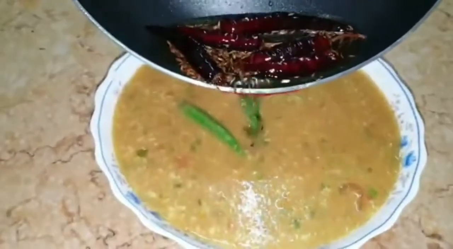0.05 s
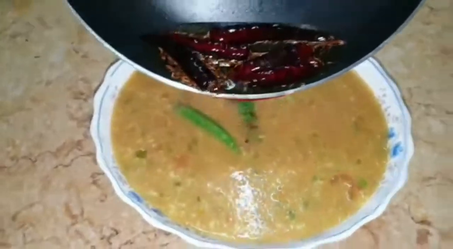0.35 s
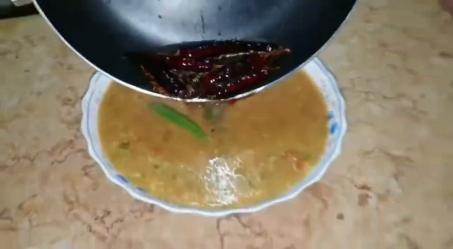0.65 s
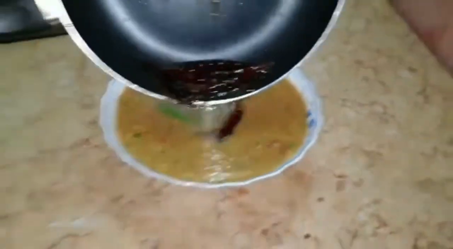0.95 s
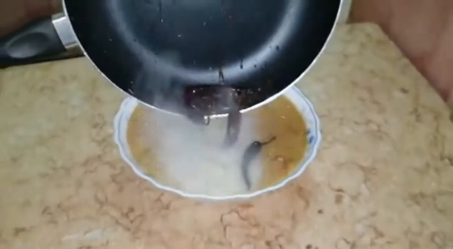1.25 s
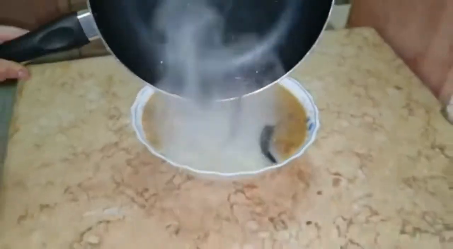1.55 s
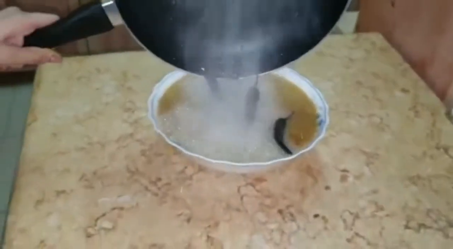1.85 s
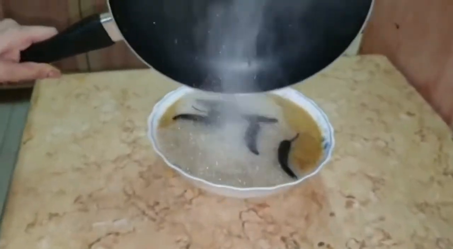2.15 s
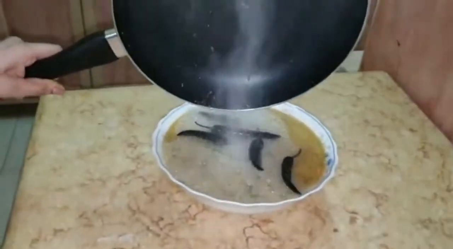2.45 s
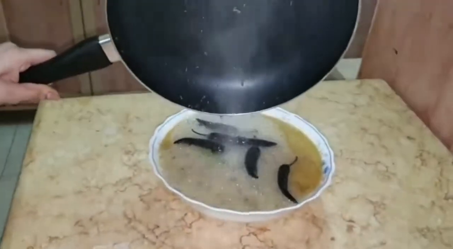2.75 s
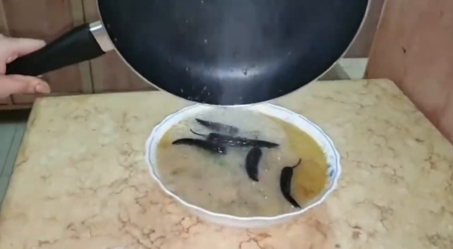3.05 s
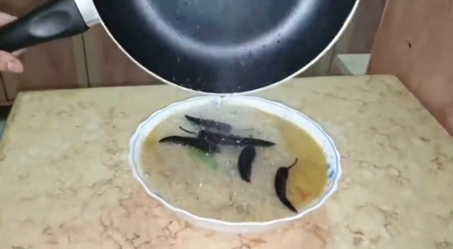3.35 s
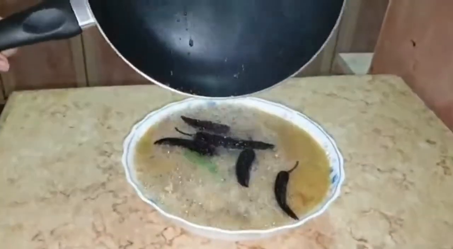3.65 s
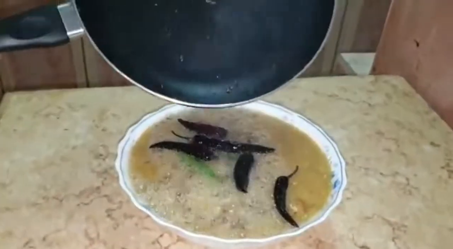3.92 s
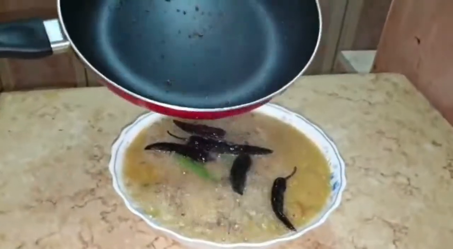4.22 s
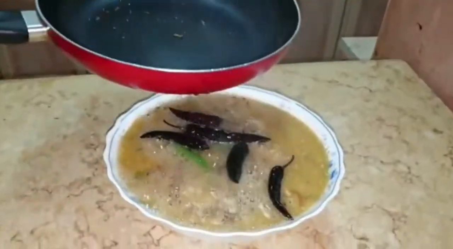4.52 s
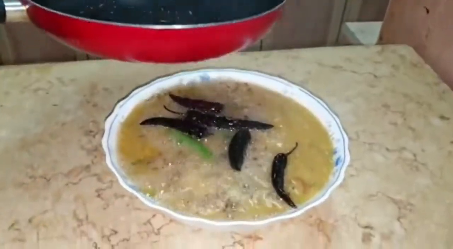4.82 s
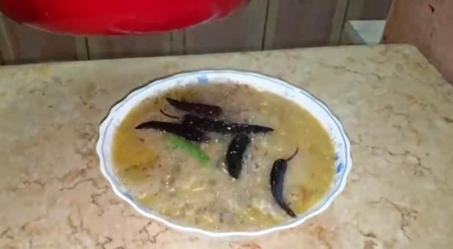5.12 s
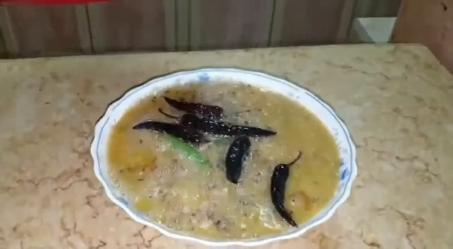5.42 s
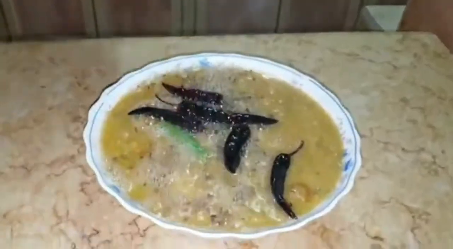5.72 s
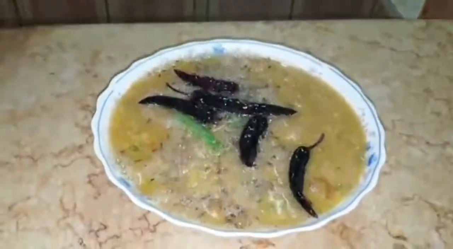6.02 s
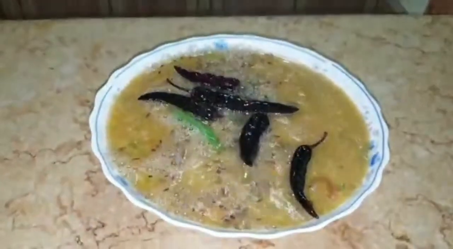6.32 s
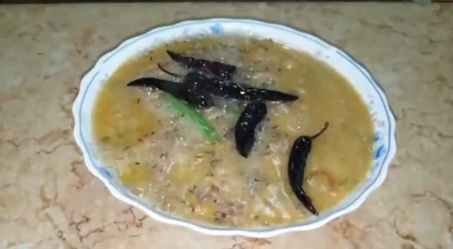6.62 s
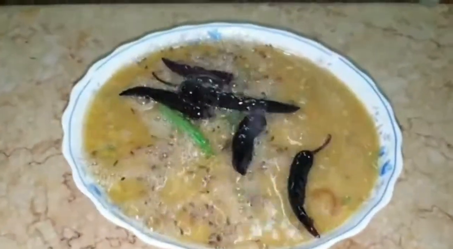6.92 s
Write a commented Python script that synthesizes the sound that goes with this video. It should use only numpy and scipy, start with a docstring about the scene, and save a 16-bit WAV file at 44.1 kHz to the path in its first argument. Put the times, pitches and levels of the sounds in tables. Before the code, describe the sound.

Close by in a kitchen, a dense, bright sizzle flares up as hot oil lands in a bowl of cooked lentils. After a single loud spit, the hiss gradually dies down to a gentle fizzing simmer, where separate bubbles pop, tick and ping more and more often. Behind it are a soft, wavering motor hum and a low room rumble that rises toward the end.

```python
"""Hot spiced oil sizzles as it is poured from a pan onto a bowl of dal on a kitchen counter.
Water flashes to steam in thousands of tiny bursting bubbles, each a damped, slightly rising sine.
The fierce sizzle spits once, then thins to a quiet crackle with snaps, pings and one soft splutter.
A motor hums in the room; a low rumble grows toward the end."""
import sys
import numpy as np
from scipy import signal
from scipy.fft import rfft, irfft
from scipy.io import wavfile
from scipy.ndimage import uniform_filter1d

SR = 44100
rng = np.random.default_rng(int(sys.argv[2]) if len(sys.argv) > 2 else 0)


def log_audio(samples):
    """Write samples as a 16-bit WAV file to the path given in sys.argv[1]."""
    # one column per channel
    frames = np.atleast_2d(samples).T
    # limit to full scale, then quantise
    limited = np.clip(frames, -1, 1)
    pcm = np.round(limited * 32767).astype(np.int16)
    wavfile.write(sys.argv[1], SR, pcm)


N = 316197
T = np.arange(N) / SR
TOP_HZ = 16150
LEAD_SAMPLES = 32  # pad before a bubble, so either channel can lead

# oil meets water, 7 in the pour, 3 late spatters: start_s, rise_s, cool_s, large_db, medium_db, fine_db
SPLASH_FLARES = [(0.036, 0.064, 0.52, -37.5, -34, -27), (0.155, 0.13, 1.4, -25, -28, -23.5),
                 (0.38, 0.035, 0.23, -25, -29, -33), (0.51, 0.06, 0.36, -28.5, -21.5, -24.5),
                 (0.64, 0.066, 0.05, -42, -20, -20.5), (0.9, 0.16, 1.1, -25.5, -20, -22.5),
                 (0.98, 0.19, 0.18, -24.8, -39, -22), (5.7, 0.034, 0.14, -44, -47, -55),
                 (6.65, 0.029, 0.1, -45, -57, -39), (6.905, 0.0069, 0.031, -59, -52, -36)]
# large, medium, fine bubbles: cool_factor, fade_exponent, simmer_db
BUBBLE_SIZES = [(1.226, 1.6, -42.5), (1.61, 1.2, -37.5), (1.16, 1.86, -36)]
# limits of the three sizes: edge_hz
SIZE_EDGES_HZ = [900, 2500, 8000, 16000]
# lasting simmer: time_s, gain_db
SIMMER_SWELL = [(0, -29.5), (1.1, -8), (3.75, 1.8), (3.97, 0), (4.15, 1.7), (4.5, 0.8), (4.79, 1.6),
                (4.87, -1), (5.0, 1.7), (5.32, 1.1), (5.5, -1.5), (5.7, -0.1), (5.92, -1.2), (6.25, -1.76),
                (6.4, -3), (6.54, -1.2), (7.02, -2), (7.09, -3.5)]
# sizzle colour per stage: freq_hz, gain_db
TRICKLE_EQ = [(240, -49), (400, -23), (607, -15.5), (730, -18.5), (1000, -12), (1150, -1.5), (1420, -1.5),
              (1900, -1), (2300, -3), (3300, -8), (3950, -4), (5960, -9), (7060, -9.5), (8500, -13),
              (12700, -10.5), (16000, -18)]
PLUNGE_EQ = [(240, -58), (400, -19), (460, -19), (496, -17.5), (921, -11), (1160, -14), (1560, -4.5),
             (2100, -2.2), (2550, -3.5), (3160, -6.5), (3990, -6.5), (5030, -11), (7400, -11), (8630, -14),
             (12700, -7), (16000, -17)]
FOAM_EQ = [(240, -44), (400, -6), (432, -33), (467, -5), (616, -13.5), (1140, -7.5), (1310, -19),
           (1420, -8.5), (1990, -3.5), (3260, -1.5), (4200, -3), (7630, -7), (8630, -11), (10700, -6.5),
           (13300, -6), (16000, -12)]
SIMMER_EQ = [(350, -10), (700, -18.5), (1000, -12), (1200, -3.5), (1450, 2.5), (1700, -2.5), (2050, 0.5),
             (2500, 0), (3150, -4), (3600, 0.5), (4300, 3), (6000, 1), (7400, 1), (8900, -7), (11000, -2.5),
             (14000, -4.5), (16000, -11.5)]
# colour blend: time_s, stage (0 trickle, 1 plunge, 2 foam, 3 simmer)
POUR_STAGE = [(0, 0), (.55, 0), (.7, 0.5), (.82, 0.85), (1.05, 1), (1.4, 1.5), (2.1, 1.5), (2.8, 2.5),
              (3.6, 2.5), (4.6, 2.5)]
# crackle over fizz: time_s, gain_db
CRACKLE_MIX = [(0, -4.5), (.4, -8), (1.2, -9), (2.4, -6), (3.5, -7.5), (4.6, -3), (6, 1), (7.1, -0.5)]
# flicker of the sizzle's colour: freq_hz, depth_db
SIZZLE_FLICKER = [(1400, 2.0), (4000, 1), (12000, 1.76)]
# microphone port balance: freq_hz, left_minus_right_db
PORT_BALANCE = [(200, -6), (600, 3.2), (1100, 0.5), (2200, -6), (2800, -2.5), (3300, -1), (4300, 0),
                (6700, 5.5), (8500, 3.5), (10000, 1), (12500, -2), (16000, -1)]
# kitchen decay: freq_hz, t60_s
ROOM_DECAY = [(300, 0.72), (2000, 0.14), (6000, 0.27), (15000, 0.057)]
# room noise colour: freq_hz, gain_db
ROOM_NOISE_EQ = [(15, -35), (25, -4), (40, -5), (59, -10.5), (110, -5.5), (178, -10), (201, -9),
                 (230, -7.5), (383, -5.5), (452, -11), (900, -21), (1170, -45), (1980, -120)]
# room noise width: freq_hz, side_db
ROOM_NOISE_SIDE = [(40, -17), (130, -14.0), (260, -10.5), (600, -1)]
# deep and upper rumble: time_s, gain_db
DEEP_SWELL = [(0.02, -46), (0.86, -55), (1.51, -55), (1.77, -46), (2.05, -54), (2.31, -56), (2.87, -45),
              (3.01, -64), (3.27, -38), (4.2, -59), (4.42, -42), (4.7, -47), (5.14, -49), (5.75, -50),
              (6.6, -40), (6.85, -41), (6.99, -53), (7.17, -35)]
UPPER_SWELL = [(0.0, -55), (0.2, -47.5), (0.92, -52), (1.05, -46), (1.9, -46), (3.01, -54.5), (3.3, -43),
               (3.73, -53), (4.19, -49), (4.47, -54), (4.57, -48), (6.5, -48.5), (6.76, -37), (6.9, -39),
               (7.0, -41.5), (7.17, -31)]
# motor lines: pitch_hz, level_db
MOTOR_LINES = [(58, -52.5), (117, -63), (176, -57), (229, -58), (458, -61.5)]
# motor swell: time_s, gain_db
MOTOR_SWELL = [(0.05, 13), (0.2, 9), (1.0, -2), (1.55, 1), (1.75, 12), (2.1, 6), (2.3, -3.5), (3.1, -3),
               (3.3, -2), (3.8, -3), (4.3, 4), (4.6, 2.5), (5.35, 4), (5.75, 1), (6.05, -2), (6.3, 9),
               (6.65, 15.5), (6.8, 11), (7.17, 7)]
# dry bursts: start_s, knock_db, knock_hz, tick_db, left_minus_right_db
SNAP_EVENTS = [(0.1497, -18, 7890, -15, -2), (3.6664, -20, 5150, -19, -3), (3.9641, -22, 3510, -28, 1),
               (4.5676, -23, 4220, -17, -4), (4.6256, -22, 2010, -30, -2), (5.2136, -18, 5590, -26, 1),
               (5.3844, -24, 2130, -30, -4), (5.6274, -20, 6640, -23, 3), (5.2829, -20, 5140, -20, -1),
               (5.3538, -16, 5740, -27, 2), (5.5215, -17, 6190, -27, 0), (5.7231, -18, 2350, -30, -4),
               (6.0427, -18, 7400, -11.5, -4), (6.217, -21, 6980, -24, 3), (6.0241, -22, 2000, -32, -5),
               (6.1483, -19.5, 2300, -28, -5), (6.2499, -23, 2480, -30, -4), (6.2651, -19, 5360, -24, 2),
               (6.2865, -19, 2300, -30, -4), (6.5406, -21, 2540, -30, -3), (6.5887, -24, 2450, -30, -4),
               (6.6141, -22, 1910, -30, -6), (6.7073, -21, 4640, -15, 4), (6.8631, -20, 2200, -26, 0),
               (7.0002, -20, 2410, -29, 0), (6.3217, -20, 2200, -26, -2), (6.4793, -18, 5500, -25, 4),
               (6.5248, -22, 3100, -17, -4), (4.058, -23, 3850, -28, 0), (5.845, -26, 2000, -28, -3),
               (5.9528, -24, 2300, -28, -3), (6.1095, -21, 7300, -25, 2), (6.1152, -21, 4800, -28, 1),
               (6.4515, -23, 1750, -32, -3), (6.5094, -22, 2070, -30, -3), (6.6802, -25, 7500, -15, 0),
               (6.7955, -25, 7000, -17, 0), (6.8405, -21, 4600, -28, 1), (7.0685, -22, 9500, -24, 0),
               (7.095, -23, 2150, -19, -2), (6.7268, -16, 4200, -8.5, 0), (6.728, -18.5, 2300, -11, 0),
               (6.7768, -22, 7810, -16, 2), (6.846, -15, 2600, -28, -3), (6.9149, -22, 10500, -11, 0),
               (6.9915, -17, 4500, -24, 2), (6.9928, -17.5, 2200, -28, -3), (7.144, -17, 1960, -34, 0)]
# ringing open bubbles: start_s, level_db, pitch_hz, left_minus_right_db
PING_EVENTS = [(4.4524, -20, 4550, 1), (4.6444, -33, 1480, 2), (4.6852, -33, 1430, 2), (4.77, -34, 1500, 0),
               (4.892, -22, 4060, 1), (5.394, -22, 5300, 3), (5.1781, -16, 5240, 3), (5.431, -20, 5350, 3),
               (6.0522, -16, 5910, 2), (6.0935, -16, 5240, 3), (6.1741, -23, 4620, 2),
               (6.199, -17, 5100, 2), (6.2874, -26, 3670, -2), (6.2923, -22, 4400, 1),
               (6.3219, -19.5, 3680, 3), (6.4081, -24, 5280, 4), (6.669, -23, 5890, 5),
               (6.9634, -20, 5190, 7), (7.0125, -20, 5990, 2), (7.0347, -21, 5060, 1),
               (7.1122, -17, 5120, 7)]


def amp(db):
    return 10 ** (np.asarray(db) / 20)


def unit_rms(x):
    return x / np.sqrt(np.mean(x ** 2) + 1e-20)


def at_freq(table, hz):
    """Interpolate on a log frequency axis."""
    freq_hz, value = np.transpose(table)
    return np.interp(np.log(hz + 1), np.log(freq_hz + 1), value)


def at_time(table, t=T):
    return np.interp(t, *np.transpose(table))


def butter(x, cutoff_hz, kind):
    return signal.sosfilt(signal.butter(2, cutoff_hz, kind, fs=SR, output="sos"), x)


def add(mix, start_s, sound):
    part = mix[:, max(round(start_s * SR), 0):][:, :sound.shape[1]]
    part += sound[:, :part.shape[1]]


def at_peak(peak_db, pan_db, sound):
    return sound / abs(sound.mean(0)).max() * amp(peak_db + pan_db * np.array([[.5], [-.5]]))


def drift(rate_hz):
    """Slow noise, rms 1."""
    hz = np.fft.rfftfreq(N, 1 / SR)
    return unit_rms(irfft(rfft(rng.standard_normal(N)) / (1 + (hz / rate_hz) ** 4), N))


def radiate(x):
    """A small source gives off no bass."""
    return butter(x, [600, 15000], "band")


def kitchen(x, wet_db):
    """Add sparse reflections; treble dies first."""
    taps = rng.standard_normal((2, SR // 3)) * (rng.random((2, SR // 3)) < .1)
    taps[:, :100] = 0
    hz, t, bins = signal.stft(taps, SR, nperseg=256)
    decay = amp(-60 * t / at_freq(ROOM_DECAY, hz)[:, None])
    tail = signal.istft(bins * decay, SR, nperseg=256)[1]
    return x + amp(wet_db) * signal.fftconvolve(x, tail / np.linalg.norm(tail[0]), axes=1)[:, :N]


def bubble(hz, cycles, lag_s, rise=0.047):
    """A cavity rings down to 1/e in `cycles`, pitch rising slightly; the right channel lags."""
    t = np.maximum(np.arange(-LEAD_SAMPLES, 1200) / SR + np.array([[lag_s], [-lag_s]]) / 2, 0)
    age = hz * t / cycles
    glide = 1 + rise * (1 - np.exp(-age / 2))
    return np.exp(-age) * np.sin(2 * np.pi * hz * t * glide)


def swarm(per_s, spread_db, cycles, flurry_db, tilt_db=0, pitches=80):
    """Bubbles of many sizes burst at random across the bowl, in flurries."""
    out = np.zeros((2, N))
    flurry = amp(flurry_db * drift(18))
    for hz in np.linspace(np.sqrt(700), np.sqrt(TOP_HZ), pitches) ** 2:
        chance, rank, sign = rng.random((3, N))
        born = chance < per_s / pitches / SR
        train = np.zeros(N)
        train[born] = amp(-spread_db * np.log(.08 + rank[born])) * np.sign(sign[born] - .5)
        ring_cycles = cycles * 2 ** rng.uniform(-1.54, 1.23)
        ring = bubble(hz, ring_cycles, lag_s=4e-5 + 0.00012 * rng.standard_normal())
        bursts = signal.oaconvolve(train[None], ring / np.linalg.norm(ring), axes=1)[:, :N]
        out += bursts * amp(tilt_db * hz / TOP_HZ)
    return unit_rms(out * flurry)


def ringers(per_s, spread_db, cycles, centre_hz=5200, spread_oct=0.75):
    """Bubbles ring briefly, each at its own pitch and place."""
    out = np.zeros((2, N))
    starts_s = T[rng.random(N) < per_s / SR]
    for start_s, (detune, length, place, strength) in zip(starts_s, rng.standard_normal((N, 4))):
        pitch_hz = np.clip(centre_hz * 2 ** (spread_oct * detune), 1100, 14000)
        ring = bubble(pitch_hz, cycles * 2 ** (0.5 * length), lag_s=4e-5 + 0.0001 * place)
        add(out, start_s, amp(spread_db * min(strength, 2)) * ring / np.linalg.norm(ring))
    return unit_rms(out)


def boiling_db(t, waver_db=0.55, cooled_db=9):
    """Level per bubble size: each splash flares and cools over a lasting simmer."""
    swell_db = at_time(SIMMER_SWELL, t) + waver_db * np.interp(t, T, drift(4.9))
    levels_db = []
    for size, (cool_factor, fade_exponent, simmer_db) in enumerate(BUBBLE_SIZES):
        power = amp(simmer_db + swell_db) ** 2
        for start_s, rise_s, cool_s, *peaks_db in SPLASH_FLARES:
            flare = np.clip((t - start_s) / rise_s, 0, 1)
            age = np.maximum(t - start_s - rise_s, 0) / (cool_s * cool_factor)
            power += (flare * amp(peaks_db[size] - cooled_db * age ** fade_exponent)) ** 2
        levels_db.append(10 * np.log10(power))
    return levels_db


def sizzle_flicker(hz, frames):
    """Gain, bins x frames: brief random patches of pitch make the sizzle's colour flicker."""
    noise = rng.standard_normal((len(hz), frames))
    patches = unit_rms(uniform_filter1d(uniform_filter1d(noise, 2, axis=0), 9, axis=1))
    return amp(at_freq(SIZZLE_FLICKER, hz)[:, None] * patches)


def pour_colour(hz, t, wander_oct=0.034):
    """Gain, bins x frames: stages crossfade; lower resonances wander as the foam heaves."""
    stage = at_time(POUR_STAGE, t)
    heave = np.outer(1 / (1 + (hz / 5000) ** 4), np.interp(t, T, drift(6)))
    shifted_hz = hz[:, None] * 2 ** (wander_oct * heave)
    return amp(sum(at_freq(eq, shifted_hz) * np.maximum(1 - abs(stage - k), 0)
                   for k, eq in enumerate([TRICKLE_EQ, PLUNGE_EQ, FOAM_EQ, SIMMER_EQ])))


def boil_gain(hz, t, colour):
    """Gain, bins x frames: each size band boils at its own level, shading into the next."""
    edges_hz = np.array(SIZE_EDGES_HZ)
    centres_hz = np.sqrt(edges_hz[:-1] * edges_hz[1:])
    gain_db = 0
    for low_hz, high_hz, level_db, one_hot in zip(edges_hz, edges_hz[1:], boiling_db(t), np.eye(3)):
        in_band = (hz >= low_hz) & (hz < high_hz)
        band_db = 10 * np.log10(np.mean(colour ** 2 * in_band[:, None], 0))
        weight = at_freq(np.c_[centres_hz, one_hot], hz)
        gain_db += weight[:, None] * (level_db - band_db)
    return amp(gain_db)


def sizzle(gain_db=-0.17):
    """Steam bursts: dense fizz, sparser crackle and ringers, shaped by pour stage and boiling."""
    fizz = swarm(per_s=40000, spread_db=0.0, cycles=1.2, flurry_db=-0.04)
    crackle = swarm(per_s=1500, spread_db=3.5, cycles=1.0, flurry_db=1.5, tilt_db=-4.0)
    ringing = amp(-7.5) * ringers(per_s=400, spread_db=3.0, cycles=5.9)
    bursts = fizz + amp(at_time(CRACKLE_MIX)) * kitchen(crackle + ringing, wet_db=-3.5)
    framing = dict(nperseg=512, noverlap=384)
    hz, t, bins = signal.stft(bursts, SR, **framing)
    bins *= amp(np.array([[.5], [-.5]]) * at_freq(PORT_BALANCE, hz))[..., None]
    bins *= sizzle_flicker(hz, len(t))
    bins /= np.sqrt(np.mean(abs(bins.mean(0)) ** 2, 1, keepdims=True))  # whiten before colouring
    colour = pour_colour(hz, t)
    white = signal.istft(bins, **framing)[1][:, :N]
    shaped = signal.istft(bins * colour * boil_gain(hz, t, colour), **framing)[1][:, :N]
    return amp(gain_db) * shaped / white.mean(0).std()


def rumble(deep_mean_db=-54.0, upper_gain_db=-3.0, air_db=-54.0, slosh_gain_db=-33):
    """Low room noise: two bands swell over steady air; large bubbles stir the dal."""
    hz = np.fft.rfftfreq(N, 1 / SR)
    mid, side = rfft(rng.standard_normal((2, N))) * amp(at_freq(ROOM_NOISE_EQ, hz))
    side *= amp(at_freq(ROOM_NOISE_SIDE, hz))
    stereo = np.array([mid + side, mid - side])
    deep = 1 / (1 + (hz / 75) ** 8)
    low = 1 / (1 + (hz / 260) ** 6)
    swell_db = at_time(DEEP_SWELL)
    bands = [(deep, deep_mean_db + swell_db - swell_db.mean()),
             (low - deep, upper_gain_db + at_time(UPPER_SWELL)),
             (1 - low, air_db),
             (low * (1 - low), slosh_gain_db + boiling_db(T)[0])]
    return sum(amp(level_db) * unit_rms(irfft(stereo * band, N)) for band, level_db in bands)


def motor_hum(gain_db=-0.6, swell_scale=0.79, waver_db=2.8, wander_rad=0.63):
    """Wavering motor lines swell and fade together, the lowest most."""
    swell_db = swell_scale * at_time(MOTOR_SWELL)
    lowest_hz = MOTOR_LINES[0][0]
    out = 0
    for hz, line_db in MOTOR_LINES:
        root_ratio = np.sqrt(hz / lowest_hz)
        rms = amp(line_db + gain_db + swell_db / root_ratio + waver_db * drift(13.0))
        phase_rad = 2 * np.pi * hz * T + wander_rad * root_ratio * drift(2.6)
        out += np.sqrt(2) * rms * np.sin(phase_rad)
    return out


def snaps(gain_db=-1.5, crack_gain_db=-6, crack_delay_s=0.00058):
    """A large bubble's film tears with a tick; its cavity knocks, then caves in with a crack."""
    out = np.zeros((2, N))
    tick = butter(bubble(hz=13700, cycles=4.2, lag_s=5e-6), 7000, "high")
    crack = radiate(bubble(hz=4300, cycles=0.53, lag_s=2e-5))
    for start_s, knock_db, knock_hz, tick_db, pan_db in SNAP_EVENTS:
        knock = radiate(bubble(knock_hz, cycles=0.97, lag_s=0.076 / knock_hz))
        at_s = start_s - LEAD_SAMPLES / SR
        add(out, at_s, at_peak(knock_db, pan_db, knock) + at_peak(tick_db, pan_db, tick))
        add(out, at_s + crack_delay_s, at_peak(knock_db + crack_gain_db, pan_db, crack))
    return amp(gain_db) * kitchen(out, wet_db=-9.0)


def spit(start_s=1.7887, gap_s=0.0015, knock_db=-14.0, snap_db=-8, thud_db=-26.5):
    """One big double spit in the foam, with a hollow knock and a soft thud."""
    out = np.zeros((2, N))
    add(out, start_s, amp(knock_db) * bubble(hz=1040, cycles=1.73, lag_s=6e-5))
    add(out, start_s, amp(snap_db) * bubble(hz=2700, cycles=2.4, lag_s=6e-5))
    add(out, start_s + gap_s, amp(snap_db) * bubble(hz=4100, cycles=4.1, lag_s=3e-5))
    out = radiate(out)
    add(out, start_s, amp(thud_db) * bubble(hz=255, cycles=0.96, lag_s=6e-5))
    return kitchen(out, wet_db=-7.5)


def pings(gain_db=1.5, cycles_at_5khz=4.1):
    """Open bubbles ring at a clear pitch; large ones ring longest."""
    out = np.zeros((2, N))
    for start_s, level_db, pitch_hz, pan_db in PING_EVENTS:
        ring = bubble(pitch_hz, cycles_at_5khz * (5000 / pitch_hz) ** 0.39, lag_s=0.05 / pitch_hz)
        add(out, start_s - LEAD_SAMPLES / SR, at_peak(level_db, pan_db, radiate(ring)))
    return amp(gain_db) * kitchen(out, wet_db=-7.5)


def splutter(start_s=5.742, length_s=.085, from_hz=1300, to_hz=560, fall_s=.03, width_hz=200):
    """A soft, hollow note drops quickly and settles, over a low stir."""
    out = np.zeros((2, N))
    samples = round(length_s * SR)
    mid, side, stir_noise = rng.standard_normal((3, N))
    pole = np.exp(-np.pi * width_hz / SR)
    blur = signal.lfilter([1], [1, -2 * pole, pole * pole], [mid + .5 * side, mid - .5 * side])
    pitch_hz = to_hz + (from_hz - to_hz) * np.exp(-T[:samples] / fall_s)
    note = unit_rms(blur[:, -samples:] * np.sin(2 * np.pi * np.cumsum(pitch_hz) / SR))
    stir = unit_rms(butter(stir_noise, [120, 380], "band")[-samples:])
    add(out, start_s, (amp(-46) * note + amp(-44) * stir) * signal.windows.tukey(samples, .3))
    return out


def scene():
    return sizzle() + rumble() + motor_hum() + snaps() + spit() + pings() + splutter()


def record(dry):
    """Small microphones lose the deepest bass; low-pass at TOP_HZ."""
    thin = butter(dry, 30, "high")
    lowpass = signal.firwin(511, TOP_HZ, window=("kaiser", 9), fs=SR)
    return signal.oaconvolve(thin, lowpass[None], "same")


dry = scene()
out = record(dry)
log_audio(out)
```